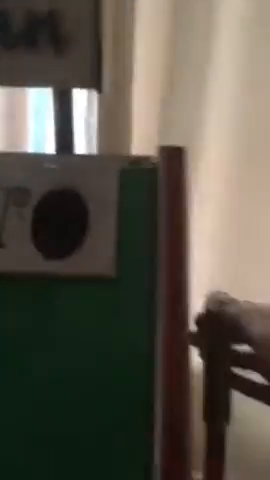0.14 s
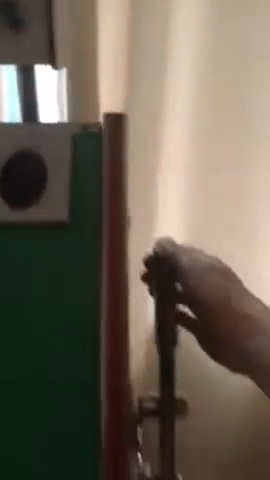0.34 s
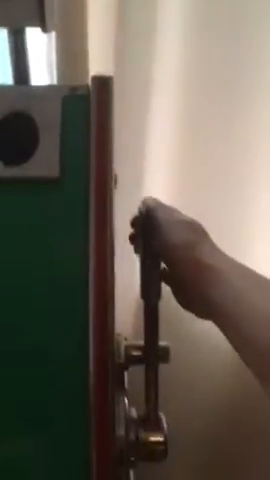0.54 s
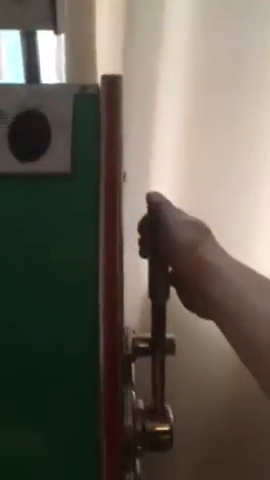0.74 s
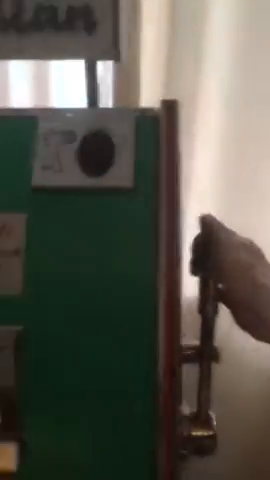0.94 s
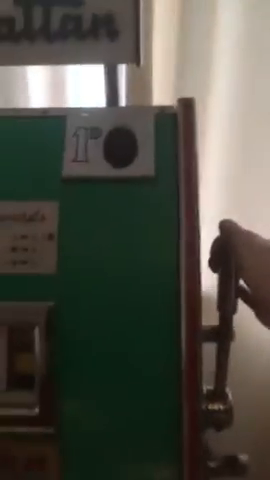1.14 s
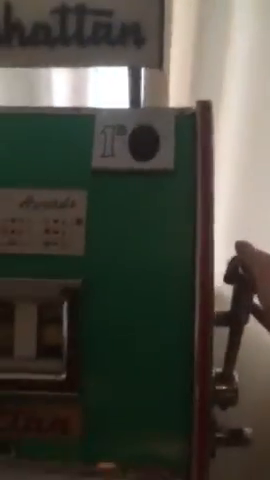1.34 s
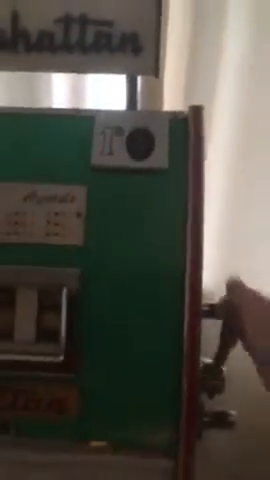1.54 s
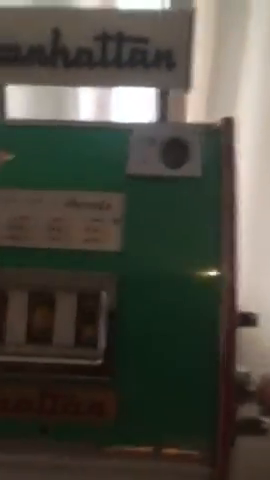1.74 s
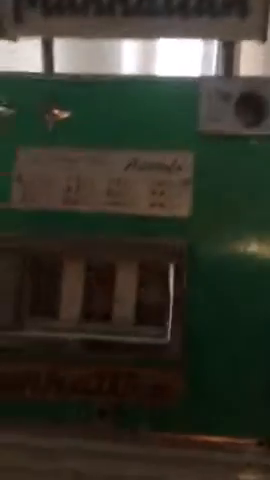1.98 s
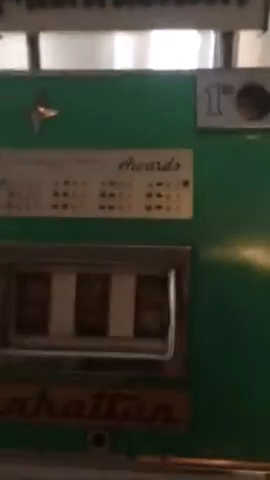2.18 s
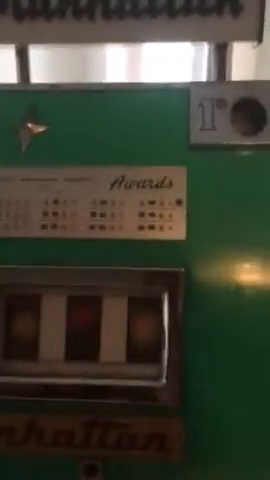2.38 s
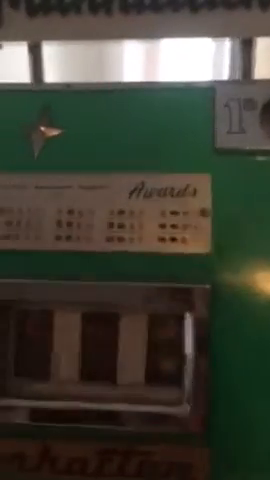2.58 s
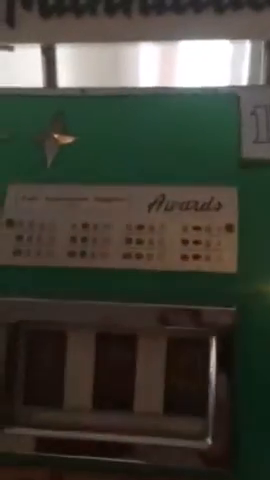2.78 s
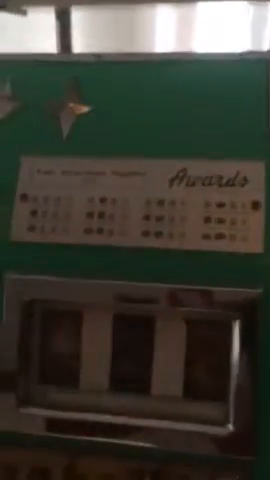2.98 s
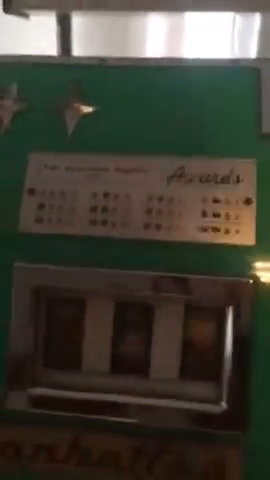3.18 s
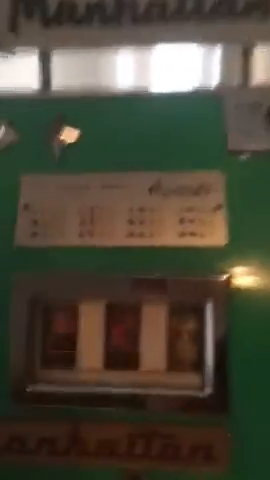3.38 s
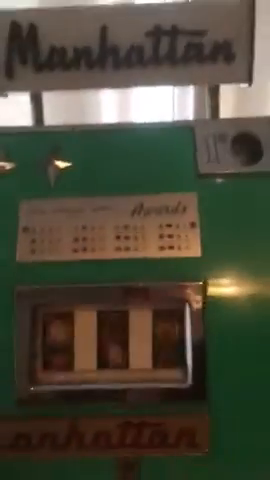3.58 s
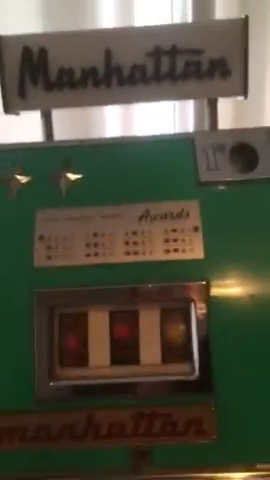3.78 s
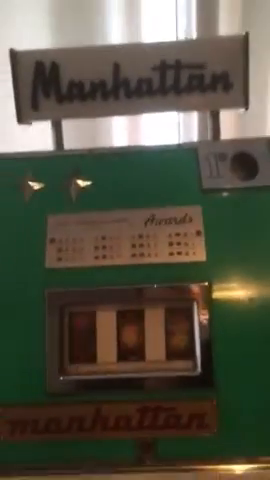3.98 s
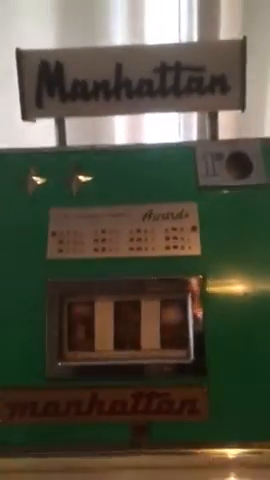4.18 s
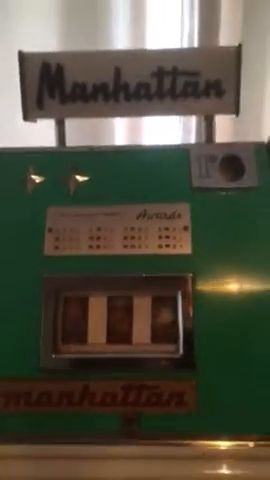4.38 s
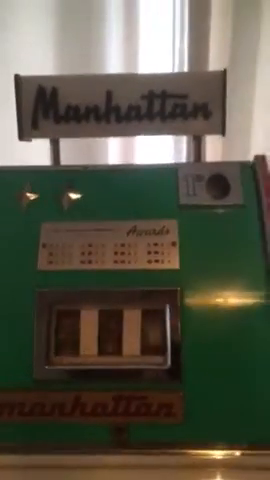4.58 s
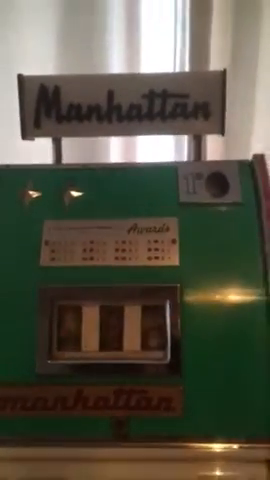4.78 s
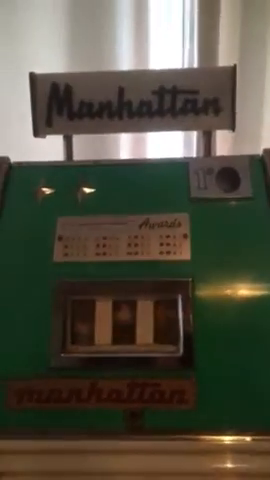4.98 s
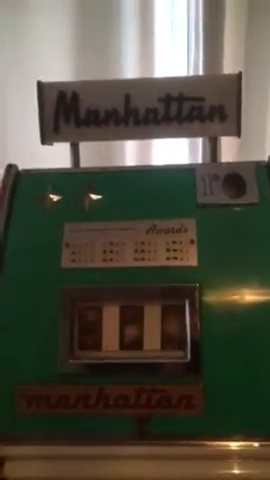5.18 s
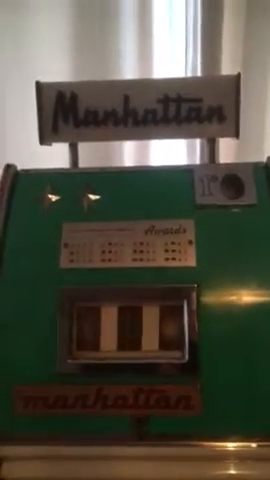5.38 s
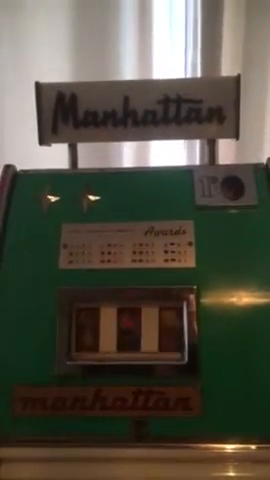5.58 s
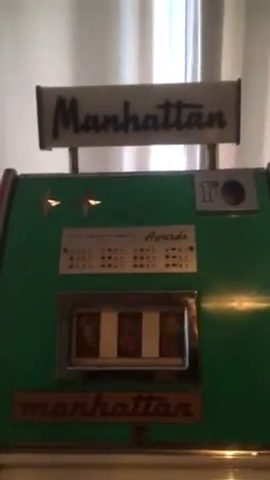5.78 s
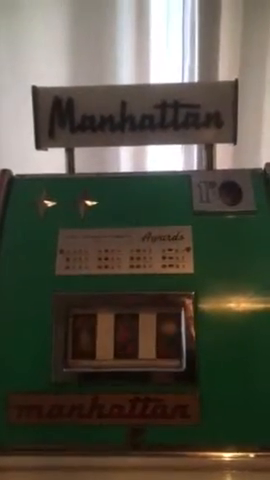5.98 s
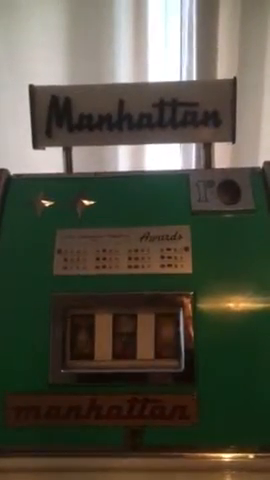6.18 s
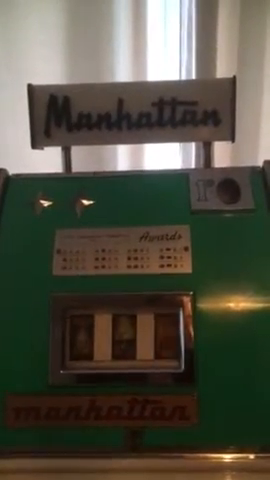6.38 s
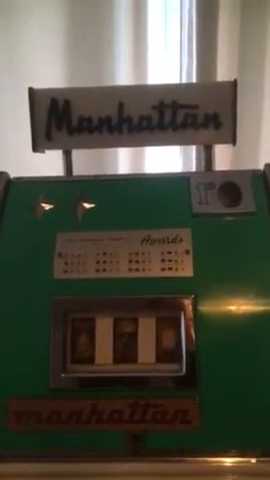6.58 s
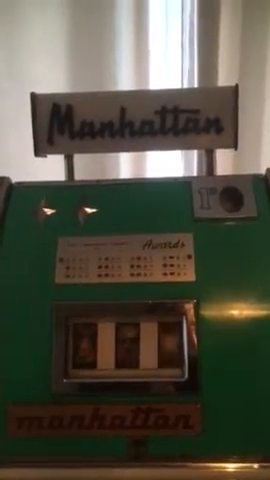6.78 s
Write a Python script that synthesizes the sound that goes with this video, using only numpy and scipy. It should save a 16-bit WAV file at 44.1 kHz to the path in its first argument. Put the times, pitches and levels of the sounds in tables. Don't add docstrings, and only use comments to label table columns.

```python
import sys
import numpy as np
from scipy import signal
from scipy.fft import rfft, irfft, next_fast_len
from scipy.io import wavfile
from scipy.ndimage import uniform_filter1d

SR = 44100
rng = np.random.default_rng(int(sys.argv[2]) if len(sys.argv) > 2 else 0)


def gain_from_db(level_db):
    decades = np.asarray(level_db, float) / 20
    return 10 ** decades


def store_pcm(level_fs):
    pcm = np.round(np.clip(level_fs, -1, 1) * 32767).astype(np.int16)
    wavfile.write(sys.argv[1], SR, np.atleast_2d(pcm).T)


N = 301644

# freq_hz, level_db, t60_s
CABINET_MODES = [(75.9, -13, 0.1), (142, -11, 0.24), (161.2, 3.5, 0.44), (207, 10.5, 0.24),
                 (271.4, -20, 0.24)]
# drop_s, strength_db, rebound_after_s
PAWL_DROPS = [
    (4.7701, -49, 0.037),
    (4.8411, -50, .037),
    (4.9173, -51, 0.035),
    (4.9965, -49, .0315),
    (5.0782, -50, .028),
    (5.1634, -50.5, 0.027),
    (5.255, -50.5, .025),
    (5.3622, -52.5, 0.025),
    (5.5091, -54.5, .022),
]
# start_s, strength_db, hardness_db, thump_db
REEL_LOCKS = [
    (4.7022, -39.5, -2.5, -42.5),
    (4.742, -51, -8, -65),
    (5.771, -59.5, -6.5, -46.5),
    (5.968, -54, -2.5, -51),
    (6.1171, -61.5, -9, -54),
    (6.2205, -59, -4, -61),
    (6.3068, -67, -12, -68),
    (6.3599, -67, -11, -64.5),
    (6.531, -44, -3, -40.5),
    (6.716, -57, -8, -44),
]


def rms_one(x):
    return x / np.sqrt(np.mean(x ** 2) + 1e-20)


def gains(rows):
    s, *columns = np.transpose(rows)
    t = np.arange(N) / SR
    return [gain_from_db(np.interp(t, s, column_db, left=-120, right=-120)) for column_db in columns]


def swells(events, rise_db_per_s, fall_db_per_s):
    s, db = np.transpose(events)[:2, :, None]
    t = np.arange(0, N + 64, 64) / SR
    rising_db, falling_db = db - rise_db_per_s * (s - t), db - fall_db_per_s * (t - s)
    level_db = np.where(t < s, rising_db, falling_db).max(axis=0)
    return gain_from_db(np.interp(np.arange(N) / SR, t, level_db))


def add(out, s, sound):
    i = round(s * SR)
    out[i:i + len(sound)] += sound[:N - i]


def grains(count, per_s, spread_db):
    size_db = spread_db * np.minimum(rng.exponential(1, count), 4)
    size = gain_from_db(size_db) * rng.choice([-1, 1], count)
    return size * (rng.random(count) < per_s / SR)


def rings(modes, length_s):
    hz, db, t60 = np.transpose(modes)[:, :, None]
    t = np.arange(round(length_s * SR)) / SR
    return gain_from_db(db - 60 * t / t60) * np.sin(2 * np.pi * hz * t)


def resonate(x, hz, width_hz):
    r = np.exp(-np.pi * width_hz / SR)
    feedback = [1, -2 * r * np.cos(2 * np.pi * hz / SR), r * r]
    return signal.lfilter([(1 - r * r) / 2, 0, (r * r - 1) / 2], feedback, x)


def through(drive, peaks):
    total = 0
    for k, (hz, width_hz, db) in enumerate(peaks):
        total = total + (-1) ** k * gain_from_db(db) * resonate(drive, hz, width_hz)
    return rms_one(total)


def coloured(x, spectrum):
    hz, db = np.transpose(spectrum)
    size = next_fast_len(N)
    log_hz = np.log(np.fft.rfftfreq(size, 1 / SR) + 1)
    shape = gain_from_db(np.interp(log_hz, np.log(hz), db))
    return rms_one(irfft(rfft(x, size) * shape, size)[:N])


def frame_modes(low_hz, high_hz, t60, slope_db, count):
    hz = np.geomspace(low_hz, high_hz, count) * gain_from_db(rng.normal(0, 0.069, count))
    damping = gain_from_db(rng.normal(0, 1.5, count))
    return np.column_stack([hz, slope_db * np.log2(hz / low_hz), t60 * damping])


def by_hardness(s, db, hard_db, hollow_db, rattle_s):
    return s, db, db + hollow_db - hard_db, db + hollow_db + hard_db, rattle_s


def contacts(events, body, uneven_db, frame_db, loose_db):
    out = np.zeros(N)
    body_ring = gain_from_db(-frame_db) * rings(body, .15)
    lows = rings(frame_modes(300, 1500, 0.051, 0.18, count=40), .15)
    mids = rings(frame_modes(1500, 5000, 0.031, -0.68, count=60), .15)
    tops = rings(frame_modes(5000, 16000, 0.011, -7.5, count=90), .15)
    t = np.arange(round(.2 * SR)) / SR
    aftershake = gain_from_db(loose_db - 60 * t / 0.17)
    first_touch = np.minimum(t / 0.0011 + 0.37, 1)
    for s, mid_db, low_db, top_db, rattle_s in events:
        decay = gain_from_db(-60 * t / max(rattle_s, .004)) + aftershake
        chatter = grains(len(t), 12000, 1.9) * decay * first_touch
        chatter[0] = 1.0
        struck = []
        for part in (lows, mids, tops):
            weights = gain_from_db(rng.normal(0, uneven_db, len(part))) * rng.choice([-1, 1], len(part))
            struck.append(weights @ part)
        struck[0] = struck[0] + gain_from_db(rng.normal(0, 2.5, len(body))) @ body_ring
        for ring, peak_db in zip(struck, (low_db, mid_db, top_db)):
            sound = signal.fftconvolve(chatter, ring)
            loudest = np.sqrt(uniform_filter1d(sound ** 2, size=200).max())
            add(out, s, gain_from_db(peak_db - 3) * sound / loudest)
    return out


def knock(out_s, db, modes, soft_s, uneven_db):
    out, ring = np.zeros(N), rings(modes, .6)
    swell = 1 - np.exp(-(np.arange(ring.shape[1]) / SR / soft_s) ** 2)
    for s, level_db in zip(out_s, db):
        weights = gain_from_db(level_db + rng.normal(0, uneven_db, len(modes)))
        add(out, s, swell * (weights @ ring))
    return out


def quiet_room():
    # freq_hz, level_db per Hz
    quiet_spectrum = [(13, -34.5), (26, -14.5), (38, -6), (59, -8), (115, -19), (140, -6.5), (211, -11.5),
                      (496, -27), (988, -25.5), (1300, -32.5), (2320, -34), (4890, -39), (6810, -38.5),
                      (13200, -40.5), (16000, -42.5)]
    return gain_from_db(-66.5) * coloured(rng.standard_normal(N), quiet_spectrum)


def floor_rumble():
    # start_s, peak_db
    floor_shakes = [
        (.05, -70.5),
        (.56, -69),
        (1.78, -55),
        (2.04, -47.5),
        (2.36, -59),
        (2.85, -48),
        (3.43, -67),
        (6.57, -62),
    ]
    gain = gain_from_db(-74) + swells(floor_shakes, rise_db_per_s=112, fall_db_per_s=71.5)
    noise = rng.standard_normal(N)
    return gain * rms_one(resonate(resonate(noise, 53, 50), 53, 50))


def lever_scrape():
    # start_s, level_db
    hand_slide = [
        (.27, -85),
        (.31, -76.5),
        (.45, -81),
        (.48, -92),
    ]
    # start_s, level_db
    lever_stroke = [(0.85, -94), (1.02, -83), (1.08, -78), (1.11, -61.5), (1.19, -69), (1.37, -67),
                    (1.48, -70), (1.68, -68), (1.83, -55.5), (2.05, -54), (2.12, -71), (2.59, -55.5),
                    (2.75, -62)]
    # freq_hz, width_hz, level_db
    linkage_peaks = [(930, 140, -7), (1520, 150, -6), (1970, 90, -1), (2300, 200, -4), (3300, 400, -11),
                     (5400, 900, -16)]
    # freq_hz, level_db per Hz
    scrape_spectrum = [(180, -16.5), (300, -5), (545, -3.5), (767, -12.5), (937, -7), (1140, -11.5),
                       (1940, -13), (3010, -27.5), (9000, -26.5), (11700, -59), (19800, -120)]
    catch_db = np.interp(np.arange(N), np.linspace(0, N, 200), rng.normal(0, 3.5, 200))
    slips = grains(N, 5500, 1.6) * gain_from_db(catch_db)
    scrape = rms_one(through(slips, linkage_peaks) + gain_from_db(-3) * coloured(slips, scrape_spectrum))
    return (gains(lever_stroke)[0] + gains(hand_slide)[0]) * scrape


def lever_and_chute():
    # start_s, strength_db, hardness_db, rattle_t60_s
    lever_hits = [(0.7872, -46, 9, 0.022), (0.9092, -49, -4, 0.052), (0.969, -53, 3, 0.019),
                  (1.0177, -53, -8, 0.022), (1.388, -50, -5, 0.025), (1.4413, -67, -10, 0.038),
                  (1.569, -68, 1, 0.037), (1.6011, -35.5, 2, 0.024), (1.635, -47, 1.5, .04),
                  (1.6544, -35, 1.5, 0.04), (1.6991, -35, 0.5, 0.073), (1.7437, -34, -1, 0.04),
                  (1.759, -36, 3, 0.07), (1.808, -35, 2.5, 0.036), (1.8553, -42.5, -5, 0.055),
                  (1.8715, -42.5, 5.5, 0.068), (1.8841, -31, 3.5, 0.063), (1.9405, -33, 4, 0.028),
                  (1.9479, -33, 3, 0.025), (1.9795, -24, 2, 0.025), (2.0036, -34.5, -10.5, 0.07),
                  (2.0782, -46, 1.5, 0.032)]
    # start_s, strength_db,
    # hardness_db, rattle_t60_s
    chute_and_catch_hits = [(2.1192, -35, 7, 0.076), (2.1265, -33.5, -4.5, 0.036), (2.1415, -36, -1, 0.03),
                            (2.1508, -36.5, 3, .04), (2.1741, -34, -0.5, 0.041), (2.1845, -46, -2, 0.049),
                            (2.1944, -43, 1.5, 0.056), (2.261, -45, 5.5, 0.034), (2.3287, -43, 4.5, 0.049),
                            (2.3418, -36.5, 10, 0.016), (2.3525, -34.5, 6.5, 0.033), (2.4314, -54.5, 11, 0.1),
                            (2.477, -56, 11, .04), (2.493, -53.5, 17, 0.054), (2.5174, -40, 9.5, 0.037),
                            (2.529, -34, 9, 0.025), (2.5443, -43.5, 1, 0.025), (2.596, -51.5, 15, 0.057),
                            (2.6366, -38, -2, 0.02), (2.738, -59, 4, .02), (2.7501, -48, -4, 0.026),
                            (2.7627, -48.5, -8, 0.024), (2.7952, -63, -15, 0.05), (2.811, -63.5, 8.5, 0.031),
                            (3.0344, -67, 0, .04), (3.4172, -68, -15.5, .02), (4.1287, -63.5, -2, .04),
                            (.9645, -58.5, -5.5, .03), (1.008, -67, -8, 0.023), (1.172, -65.5, -6.5, 0.034),
                  (1.3988, -57, -6, 0.027), (1.4447, -62.5, -4, .04), (1.4557, -65, -4, 0.032),
                  (1.722, -49, -5.5, 0.038), (1.832, -49, -2, .05), (2.025, -37, -6.5, 0.033),
                  (2.398, -51, 6, .03), (2.4665, -55, 6, .02), (2.3477, -41, 7, .02)]
    # freq_hz, level_db, t60_s
    panel_modes = [(425, -5.5, 0.22), (618.3, -11.5, 0.22), (912, -12, 0.31), (1100, -0.5, 0.08),
                   (1200, -10, 0.21), (1333, -0.5, 0.1)]
    struck = [by_hardness(s, db, hard_db, -3, rattle_s) for s, db, hard_db, rattle_s in lever_hits]
    struck += [by_hardness(s, db, hard_db, -1.23, rattle_s)
               for s, db, hard_db, rattle_s in chute_and_catch_hits]
    return contacts(struck, panel_modes, uneven_db=0.5, frame_db=-4.0, loose_db=-17.5)


def jingles():
    # freq_hz, level_db, t60_s
    link_modes = [(1163, -14, .04), (1986, -3, .1), (2476, 0, .06), (2756, -8, .05)]
    # start_s, level_db, free_s, tilt_db per octave
    link_hits = [
        (.789, -64, 0.032, -16),
        (1.019, -56, 0.012, 0),
        (2.33, -49, .03, 10),
        (2.638, -48, 0.043, 8),
    ]
    # freq_hz, level_db, t60_s
    coin_modes = [(5655, -10, .3), (9862, 0, .2), (12918, -7.5, .2)]
    # start_s, level_db, free_s, tilt_db per octave
    coin_hits = [(0.97, -69, 0.015, 2), (2.131, -41, 0.022, 4), (2.178, -45, 0.012, 8),
                 (2.215, -57, .03, 0), (2.268, -55, .06, -5), (2.343, -41, .012, -10),
                 (2.356, -36, 0.065, 3), (2.428, -46, .05, -2), (2.463, -50, 0.06, -17),
                 (2.49, -52, .03, 0), (2.519, -39, .01, 0), (2.528, -32, 0.0089, 3.5),
                 (2.547, -49, 0.05, 0), (2.598, -48, .02, 3)]
    # freq_hz, level_db, t60_s
    plate_modes = [(2385, -10, .12), (3391, 0, .2), (4296, -4, .16)]
    # start_s, level_db, free_s, tilt_db per octave
    plate_hits = [
        (1.759, -45, 0.017, 0),
        (2.356, -43, .09, 0),
    ]
    # freq_hz, level_db, t60_s
    washer_modes = [(4565, -1, .12), (4823, -4, .25), (9012, 0, .2), (10910, -8, .11)]
    # start_s, level_db, free_s, tilt_db per octave
    washer_hits = [
        (2.146, -45, 0.11, 1),
        (2.262, -53, 0.06, 0),
        (2.478, -48, .04, 12),
    ]
    # freq_hz, level_db, t60_s
    slide_modes = [(2810, 0, .06), (7946, -15, .08), (8656, -11, .08)]
    # start_s, level_db, free_s, tilt_db per octave
    slide_hits = [
        (2.262, -44, .03, 0),
    ]
    # freq_hz, level_db, t60_s
    small_modes = [(6600, -2, .13), (8317, -13, .11), (9349, 0, .15), (11370, -11, .1), (14200, -9, .08),
                   (15120, -12, .1)]
    # start_s, level_db, free_s, tilt_db per octave
    small_hits = [
        (2.351, -47, .1, -7),
        (2.478, -47, .04, 6),
        (2.494, -56, .025, -16),
    ]
    pieces = [(coin_modes, coin_hits), (small_modes, small_hits), (washer_modes, washer_hits),
              (plate_modes, plate_hits), (link_modes, link_hits), (slide_modes, slide_hits)]
    out = []
    for modes, bounces in pieces:
        main_hz = max(modes, key=lambda m: m[1])[0]
        for s, db, free_s, tilt_db in bounces:
            for hz, mode_db, t60 in modes:
                level_db = db + mode_db + tilt_db * np.log2(hz / main_hz)
                out.append((s, hz, level_db, t60, free_s))
    return out


def coins():
    out, t = np.zeros(N), np.arange(round(.3 * SR)) / SR
    for s, hz, db, t60, free_s in jingles():
        pair_modes = [(hz * .998, db - 3, 1.3 * t60), (hz * 1.0003, db + 4, 1.3 * t60)]
        pair = rings(pair_modes, .3).sum(axis=0)
        tumble = gain_from_db(np.interp(t, np.linspace(0, t[-1], 45), rng.normal(0, 2.2, 45)))
        damping = gain_from_db(-60 * np.maximum(t - free_s, 0) / .03)
        attack = np.minimum(t / .002, 1)
        add(out, s, pair * tumble * damping * attack)
    return out


def blows():
    # start_s, peak_db, panel_hz, t60_s
    pull_blows = [(0.807, -49, 157, 0.095), (0.917, -45.5, 175, 0.11), (1.034, -40, 164.5, 0.17),
                  (1.186, -39.5, 167, 0.2), (1.3, -48.5, 157, 0.26), (1.395, -38, 185, 0.1),
                  (1.458, -35, 199, 0.1), (1.612, -44, 205, 0.18), (1.717, -37, 195, 0.046),
                  (1.761, -33.5, 181, 0.098), (1.877, -21, 260, 0.083), (1.908, -33.5, 165, 0.17),
                  (1.984, -17, 234, 0.069), (2.002, -21.5, 146.4, 0.15), (2.023, -17, 161, 0.12),
                  (2.05, -32, 207, 0.11), (2.083, -22.5, 196, 0.098), (2.142, -23.5, 210, 0.12),
                  (2.195, -25.5, 167, 0.18), (2.363, -36, 160, 0.12), (2.463, -46, 195, 0.34),
                  (2.523, -33.5, 207, 0.087), (2.6, -36, 205, 0.074), (2.649, -34, 170, 0.19),
                  (2.757, -30, 156, 0.15), (2.788, -30, 140, 0.14), (2.808, -33, 165, 0.08),
                  (2.822, -27.5, 206, 0.12), (2.843, -29, 206, .2), (2.69, -41, 160, .2),
                  (2.757, -43, 405, .1), (2.812, -44, 410, .08), (2.803, -46, 530, .06),
                  (2.067, -26, 183, .07), (1.955, -38, 425, .07), (2.896, -37.5, 131, 0.17),
                  (2.925, -40.5, 157.5, 0.18), (3.419, -50.5, 164, .11)]
    pawl_blows = [(s, db + 10, 210, 0.055) for s, db, _ in PAWL_DROPS]
    lock_blows = [(s, db, 232, 0.15) for s, _, _, db in REEL_LOCKS]
    return pull_blows + pawl_blows + lock_blows


def thumps():
    out, others = np.zeros(N), rings(CABINET_MODES, .4)
    swell = 1 - np.exp(-(np.arange(round(.4 * SR)) / SR / 0.0072) ** 2)
    for s, peak_db, hz, t60 in blows():
        nearest = rings([(hz, 0, max(t60, .02))], .4)[0]
        ring = nearest + gain_from_db(-18.5 + rng.normal(0, 3, len(others))) @ others
        add(out, s - .006, gain_from_db(peak_db - 1.0) * swell * ring)
    return out


def cabinet_hum():
    gain = gain_from_db(-19.5) * swells(blows(), rise_db_per_s=500, fall_db_per_s=100.5) + gain_from_db(-64) * running()
    shake = rng.standard_normal(N)
    hum = sum(gain_from_db(db) * resonate(shake, hz, 21) for hz, db, _ in CABINET_MODES)
    return gain * rms_one(hum)


def running():
    start_s, rise_s, kick_db, settle_s, sag_db_per_s = 2.68, 0.036, -2, 0.081, 1.3
    t = np.maximum(np.arange(N) / SR - start_s, 0)
    return np.minimum(t / rise_s, 1) * gain_from_db(kick_db * np.exp(-t / settle_s) - sag_db_per_s * t)


def governor():
    # time_s, turns
    fly_turns = [(2.7, 105.7), (2.949, 115.85), (3.2, 126.08), (3.8, 149.8), (4.5, 177.42), (5.6, 221.04),
                 (6.0, 236.83), (6.84, 269.6)]
    # place_turn, level_db, bedded_place_turn, bedded_level_db
    pinion_teeth = [(.84, 0, .81, 0), (.23, -5, .1, -4), (.5, -7, .54, -13)]
    # freq_hz, width_hz, level_db
    gearbox_peaks = [(795, 28, -2), (904, 46, 1), (1473, 60, -6.5), (1803, 31, -4.5), (2060, 33, -4.5),
                     (2277, 110, -4), (2500, 177, -3), (3800, 130, -10), (4600, 100, -24)]
    # freq_hz, level_db per Hz
    whir_spectrum = [(180, -22), (300, -13.5), (487, -11), (620, 0), (705, -38.5), (790, 5), (1910, -4),
                     (2570, -7), (3180, -9), (9000, -22.5), (11700, -40), (19800, -120)]
    beds_in_s = (3.25, 3.55)
    s, turns = np.transpose(fly_turns)
    knocks = np.zeros(N) + 1e-18
    whole = np.arange(np.ceil(turns[0]), turns[-1] - 1)
    bedded = np.interp(np.interp(whole, turns, s), beds_in_s, [0, 1])
    press_db = 2.2 * np.cos(2 * np.pi * (whole - 125.0) / 12.0)
    for place, db, late_place, late_db in pinion_teeth:
        place_turn = place + bedded * (late_place - place) + rng.normal(0, .014, len(whole))
        at_s = np.interp(whole + place_turn, turns, s)
        level_db = db + bedded * (late_db - db) + press_db + rng.normal(0, 1.2, len(at_s))
        knocks[(at_s * SR).astype(int)] = gain_from_db(level_db)
    burst = gain_from_db(-60 * np.arange(round(.03 * SR)) / SR / 0.024)
    ticks = rms_one(signal.fftconvolve(knocks, burst)[:N] * rng.standard_normal(N))
    t = np.arange(N) / SR
    lull_db = 3.0 * np.interp(t, beds_in_s, [.3, 1])
    load = gain_from_db(lull_db * np.cos(2 * np.pi * np.interp(t, s, turns)))
    whir = rms_one(grains(N, 5000, 2.0) * load)
    ringing = through(rms_one(knocks) + gain_from_db(-8) * ticks + gain_from_db(-11) * whir, gearbox_peaks)
    hiss = coloured(gain_from_db(-3) * ticks + whir, whir_spectrum)
    return gain_from_db(-63.5) * running() * rms_one(ringing + gain_from_db(.5) * hiss)


def pawl_rings():
    # start_s, level_db
    arm_jolts = [
        (3.4165, -52.5),
        (5.7725, -43.5),
        (5.9695, -47.5),
        (6.1175, -44),
        (6.2209, -54.5),
        (6.3043, -50.5),
        (6.358, -56.5),
    ]
    # freq_hz, level_db, t60_s
    arm_modes = [(270.6, -7, 0.1), (517, -11, .08), (630, -13, .1), (710, -11.5, 0.084), (793, -1, 0.125),
                 (854, -5, .1), (1200, -10, 0.064), (1415, -10, .06), (1624, -10, 0.051)]
    # freq_hz, level_db, t60_s
    seat_modes = [(253, -0.5, 0.097), (400, -10, 0.085), (616, -5, 0.11), (713, -10.5, 0.083),
                  (775, -2.5, 0.062), (876, 1, 0.044), (952, -11, 0.045), (1152, -12, .05),
                  (1590, -13, 0.044), (1670, -14, .04)]
    # freq_hz, level_db, t60_s
    bar_modes = [(318, -3, 0.14), (432, -2, 0.09), (541, -2.5, .07), (635, -7, .1), (692, -20, 0.6),
                 (1185, -9, 0.07), (1510, -11, 0.13), (1680, -15, .06), (2313, -12.5, 0.11)]
    # start_s, level_db
    bar_blows = [
        (6.5327, -42.5),
        (6.543, -49),
        (6.7171, -49.5),
    ]
    s, db, gap_s = np.transpose(PAWL_DROPS)
    return (pawl_tip([*zip(s, db - 8.5), *zip(s + gap_s, db - 6.5)])
            + knock(s + 0.00453, db + 7, seat_modes, soft_s=0.0012, uneven_db=2.3)
            + knock(s + gap_s, db + 4, arm_modes, soft_s=0.0024, uneven_db=3.0)
            + knock(*np.transpose(arm_jolts), arm_modes, soft_s=0.0021, uneven_db=1.2)
            + knock(*np.transpose(bar_blows), bar_modes, soft_s=0.0015, uneven_db=1.1))


def pawl_tip(events):
    # freq_hz, level_db, t60_s
    tip_modes = [(2160, -6, 0.054), (2330, -6, .05), (3420, 0.5, 0.039), (3620, -1.5, 0.038),
                 (3810, -2.5, 0.04), (4140, -5, 0.028)]
    out, ring = np.zeros(N), rings(tip_modes, .06)
    t = np.arange(round(.05 * SR)) / SR
    for s, db in events:
        chatter = grains(len(t), 2500, 1.5) * gain_from_db(-60 * t / 0.042)
        chatter[0] = 2
        struck = gain_from_db(db + rng.normal(0, 2.5, len(ring))) @ ring
        add(out, s, signal.fftconvolve(struck, rms_one(chatter) / np.sqrt(len(t))))
    return out


def pawl_touches(touch, delayed):
    mid_db, low_db, top_db, rattle_s = touch
    return [(s + delayed * gap_s, db + mid_db, db + low_db, db + top_db, rattle_s)
            for s, db, gap_s in PAWL_DROPS]


def pawl_contacts():
    # mid_db, low_db, top_db, rattle_t60_s
    drop_touch = (-5.5, -9, -4, 0.03)
    # mid_db, low_db, top_db, rattle_t60_s
    rebound_touch = (-5, -2.5, -12.5, 0.06)
    # freq_hz, level_db, t60_s
    reel_modes = [(290, -3, .08), (425, -7, .1), (510, -9, .08), (619, -5, .16), (791, 0, .14),
                  (829, -1, .16), (905, -6, .1), (1190, -8, .09)]
    locks = [by_hardness(s, db, hard_db, -0.5, .06) for s, db, hard_db, _ in REEL_LOCKS]
    drops = pawl_touches(drop_touch, False)
    rebounds = pawl_touches(rebound_touch, True)
    return (contacts(drops, reel_modes, uneven_db=0.0, frame_db=-8.0, loose_db=-19.5)
            + contacts(rebounds + locks, reel_modes, uneven_db=2.0, frame_db=-5.0, loose_db=-26.0))


def room(x):
    t60_s, wall_cut_hz = 0.19, 15000
    size = next_fast_len(N + SR)
    w = 2 * np.pi * np.fft.rfftfreq(size, 1 / SR)
    dull = 1 / (1 + 1j * w / (2 * np.pi * wall_cut_hz))
    total = 0
    for k, lag_s in enumerate(rng.uniform(.008, .035, 10)):
        echo = gain_from_db(-60 * lag_s / t60_s) * dull * np.exp(-1j * w * lag_s)
        total = total + (-1) ** k * echo / (1 - echo)
    return irfft(rfft(x, size) * total, size)[:N]


def scene():
    metal = lever_scrape() + lever_and_chute() + coins() + governor() + pawl_rings() + pawl_contacts()
    metal = signal.sosfilt(signal.butter(2, 170, "high", fs=SR, output="sos"), metal)
    machine = metal + thumps() + cabinet_hum() + floor_rumble()
    return (machine + gain_from_db(-19.5) * room(metal) + quiet_room())[None]


def band_limit(x):
    return signal.sosfilt(signal.butter(12, 16620, fs=SR, output="sos"), x)


def record(dry):
    low_cut = signal.butter(2, 33.0, "high", fs=SR, output="sos")
    top_cut = signal.cheby2(10, 30, 16400, fs=SR, output="sos")
    mix = signal.sosfilt(np.vstack([low_cut, top_cut]), dry)
    return band_limit(mix)


dry = scene()
out = record(dry)
store_pcm(out)
```